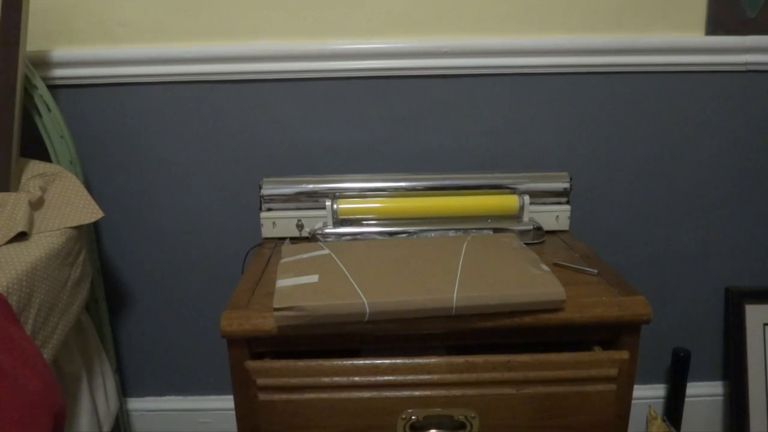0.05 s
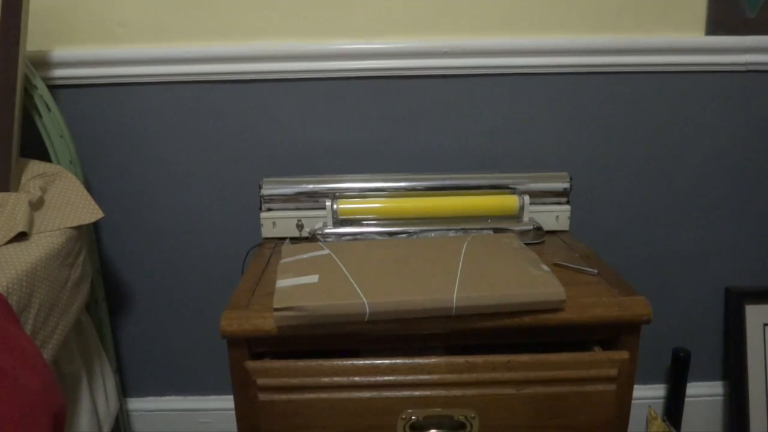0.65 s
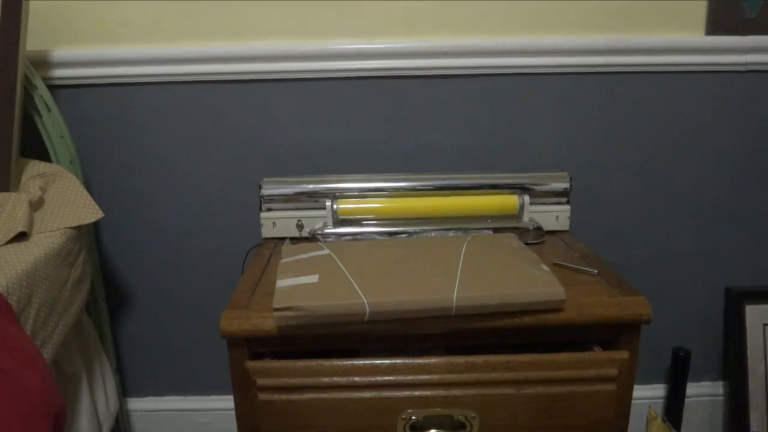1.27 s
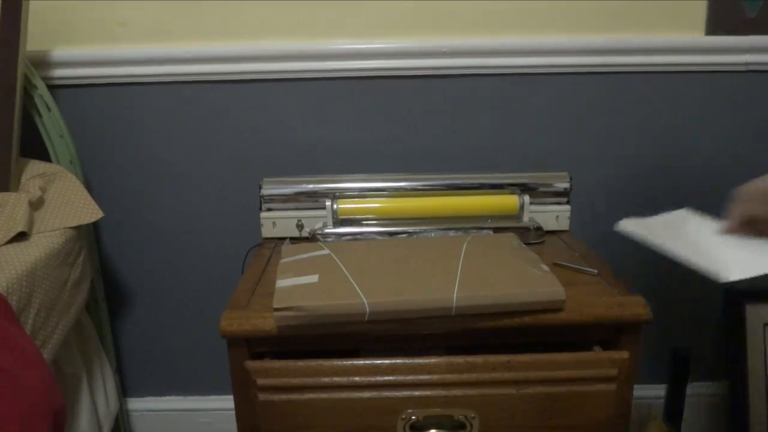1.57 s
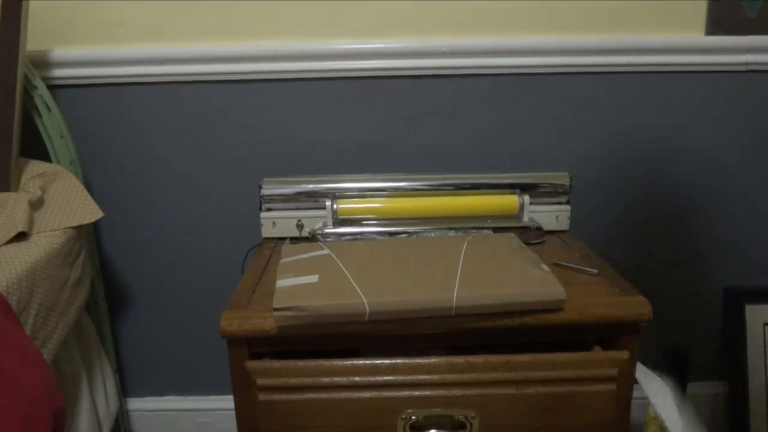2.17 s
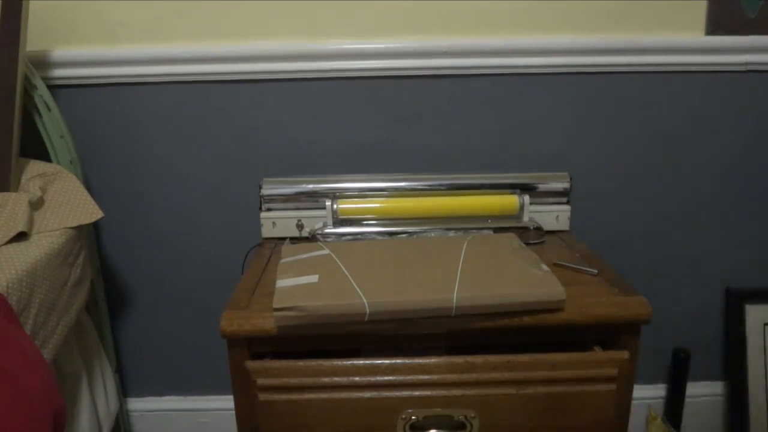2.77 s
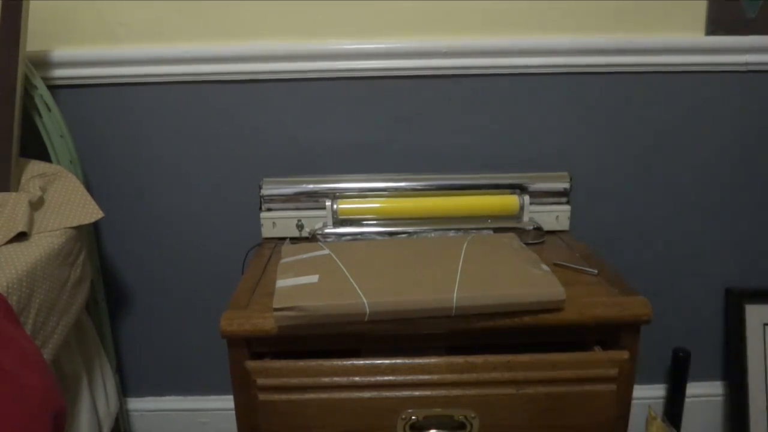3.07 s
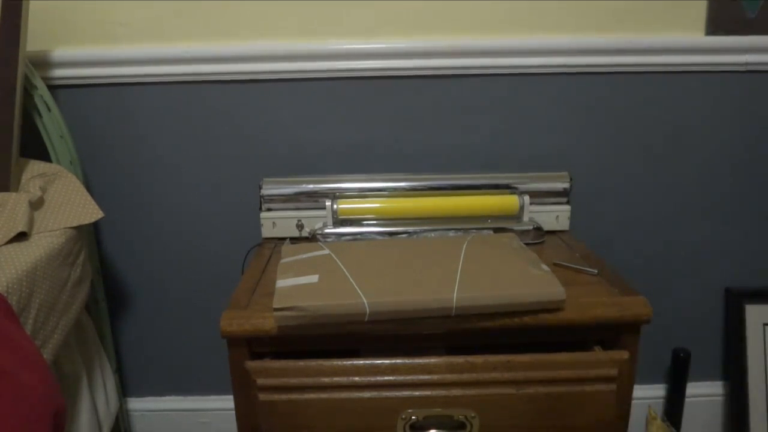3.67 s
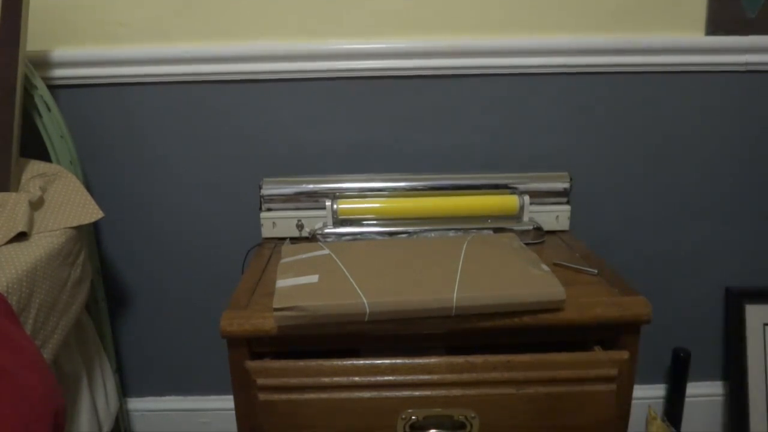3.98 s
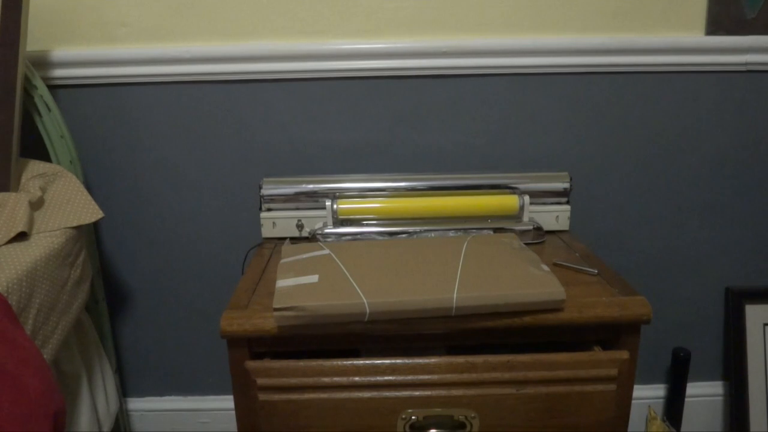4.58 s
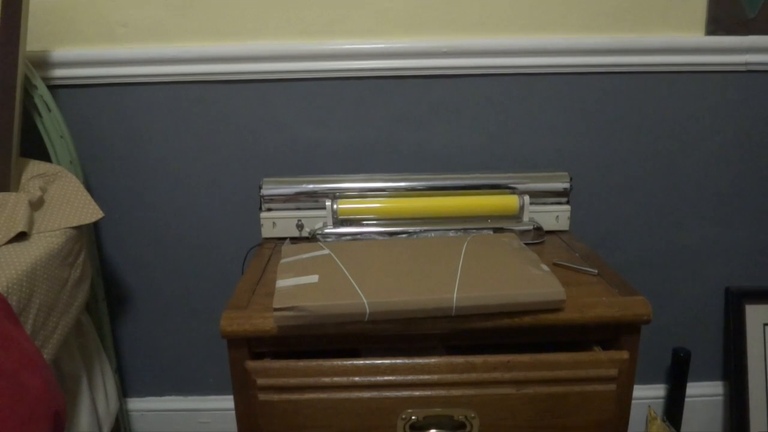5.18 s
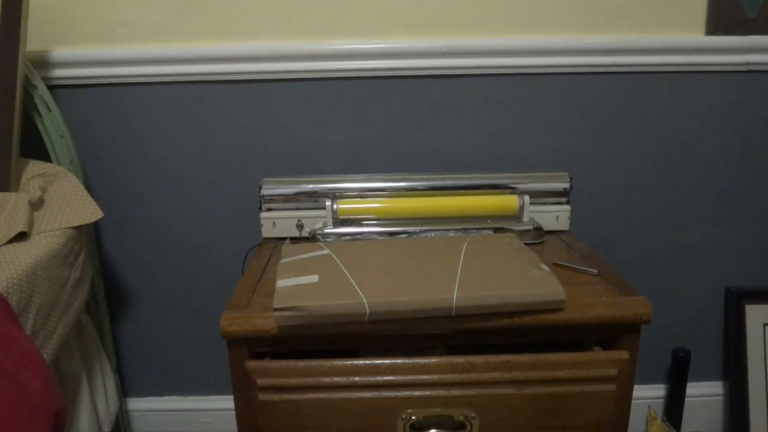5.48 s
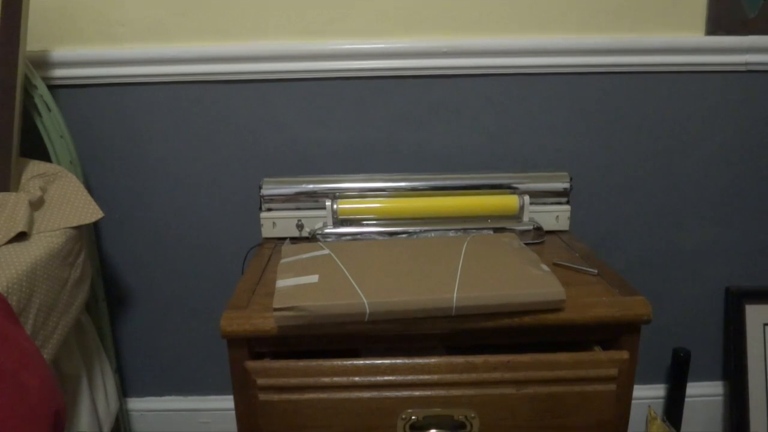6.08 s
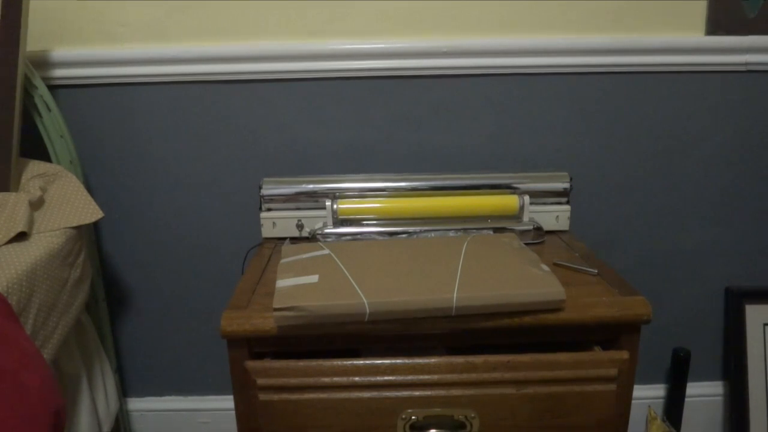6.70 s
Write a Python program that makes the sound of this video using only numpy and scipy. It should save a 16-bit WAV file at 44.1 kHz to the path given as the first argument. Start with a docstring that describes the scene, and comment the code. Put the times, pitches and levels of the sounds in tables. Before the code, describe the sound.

A paper envelope slides, crackles and is opened in a quiet room, with soft footsteps and a short floorboard creak.

```python
"""A paper envelope is drawn over a surface, then opened, and a note is pulled out, in a small quiet room.
Sheets hiss as their fibres rub and catch, creases snap as they buckle, and whole faces flip with a pop.
Before the opening, someone steps across a floorboard that sticks and slips in a short creak.
Steps and things put down give dull knocks, over a soft bed of room air."""
import sys
import numpy as np
from scipy import signal
from scipy.fft import rfft, irfft, next_fast_len
from scipy.io import wavfile

SR = 44100
rng = np.random.default_rng(int(sys.argv[2]) if len(sys.argv) > 2 else 0)


def master(y):
    """Save y as 16-bit WAV."""
    cut = np.clip(np.atleast_2d(y).T, -1, 1)
    pcm = np.round(cut * 32767)  # scale
    wavfile.write(sys.argv[1], SR, pcm.astype(np.int16))


N = 301862
TIME = np.arange(N) / SR


def paper_slide(grain_db, catch_db, catches_per_s, flutter_db, patchy_db, hollow_octaves=0.26, block=32):
    """Fibres rub in a fine grain and now and then catch; the bending sheet shifts its resonances."""
    # one sheet pushed along another: (start [s], length [s], level [dB], body [dB], brightness [dB])
    strokes = [(0.0, 0.02, -33.5, -11, -11), (0.043, 0.029, -31, 12.5, -15), (0.063, 0.095, -24, -10.5, 4),
               (0.137, 0.14, -27.5, -19, 3.5), (0.277, 0.048, -33.5, 10.5, 6.5),
               (0.354, 0.079, -42, 10, -3), (0.417, 0.076, -41.5, -2, 5), (0.52, 0.1, -49.5, 6, 10),
               (0.686, 0.13, -39.5, 2.5, -1.5), (0.816, 0.1, -49, -6, 8.5), (1.932, 0.08, -34.5, 7.5, 3),
               (2.009, 0.091, -38, 9, 6), (2.11, 0.044, -29, -6, -7), (2.276, 0.062, -35, 9, 5),
               (2.343, 0.093, -34.5, -4, 9), (2.604, 0.1, -38, 8.5, -25), (2.847, 0.056, -32.5, -14, -10.5),
               (2.99, 0.2, -34.5, -12, -5), (3.199, 0.12, -34.5, -10, 0.5), (3.288, 0.17, -24, -7.5, -5.5),
               (3.42, 0.24, -30.5, 1.5, -6.5), (3.894, 0.16, -38.5, -3, 6), (4.05, 0.145, -29, -3, -16),
               (4.223, 0.043, -28, -12, 5), (4.349, 0.084, -21.5, -7, -14.5), (4.51, 0.067, -27, 1, -14),
               (4.748, 0.19, -39, -8, 3), (4.862, .14, -38, 7.5, 3.5), (4.938, 0.017, -18, -19, -3),
               (5.06, .2, -46.5, 2, 2), (5.281, 0.059, -36.5, 10.5, 3), (5.418, 0.21, -49, 0, 6.5)]
    # light brushing while the paper is in the hands: (time [s], level [dB])
    brush = [(0, -42.5), (0.96, -44.5), (1.08, -57.5), (1.12, -43), (1.4, -44.5), (1.7, -41.5), (1.9, -46),
             (2.19, -40), (2.55, -48), (2.75, -43), (3.78, -40.5), (3.86, -41), (4.55, -36.5),
             (4.68, -44.5), (5.25, -42.5), (5.42, -45.5), (5.64, -51.5), (5.74, -59)]
    # tone of paper on paper: (frequency [Hz], gain [dB])
    slide_colour = [(60, -18), (130, -11), (280, -0.1), (520, -3), (900, -3), (1500, -2.8), (2300, -1.5),
                    (3500, -2.4), (5000, -3.5), (7000, -5), (10500, -5.5), (13000, -16), (15500, -28)]
    # the gap between the sheets rings: (middle [s], half length [s], frequency [Hz], boost [dB])
    hollows = [(0.328, .02, 950, 12), (2.0, .07, 560, 5), (2.05, .11, 4600, 6), (3.1, .11, 1800, 5),
               (3.335, .022, 1000, 9), (3.75, .07, 3100, 7)]
    brush_db, = in_time(brush)
    pushes = [from_db(brush_db)]
    pushes += [from_db(db) * hand_push(start, length) for start, length, db, _, _ in strokes]
    power = np.array([push[::block] for push in pushes]) ** 2
    brush_tone_db = (1.5, -1.5)   # body, brightness
    body_db, bright_db = np.transpose([brush_tone_db] + [row[3:] for row in strokes])
    rub = unit_energy(rng.standard_normal(N) * from_db(grain_db * drift(1800))) * np.sqrt(N)
    caught = rng.random(N) < catches_per_s / SR
    catches = caught * (2 * rng.random(N) - 1) * from_db(catch_db)
    flutter = flutter_db * drift(110)[::block]
    rings = [(hz, db * np.exp(-((TIME[::block] - s) / half) ** 4)) for s, half, hz, db in hollows]
    out = np.zeros(N)
    for hz, band in bands(rub + catches, count=30):
        ring_db = sum(db * np.exp(-(np.log2(hz / ring_hz) / hollow_octaves) ** 2) for ring_hz, db in rings)
        pressure = np.sqrt(from_db(tilt(hz, 2370, body_db, bright_db)) ** 2 @ power)
        patches = patchy_db * drift(25)[::block]   # each band wanders on its own
        gain = pressure * from_db(at_hz(slide_colour, hz) + ring_db + flutter + patches)
        out += band * np.repeat(gain, block)[:N]
    return out


def hand_push(start, length, attack_s=0.0074, attack_share=0.14, release_s=0.016):
    """A push gathers speed, a long one more slowly, and dies quickly once the hand stops."""
    rise = np.clip((TIME - start) / (attack_s + attack_share * length), 0, 1)
    return rise * np.exp(-np.clip((TIME - start - length) / release_s, 0, 20))


def paper_buckle(snap_body_db=-1.5, stiffening=0.18, flap_body_db=7, flap_bright_db=-24):
    """Creases snap and whole faces flip; stiffer creases snap harder and with less body."""
    # a crease buckles: (time [s], level [dB], brightness [dB], decay [ms])
    snaps = [(0.04, -6.5, 5, 0.99), (0.0505, 5, -3, 1.53), (0.072, 3.5, 1, 0.78), (0.1803, 13, -4, 2.56),
             (0.211, 14, -5, 5.7), (0.2685, 3.5, -10, 3.5), (0.326, -12, 0, 1.5), (1.11, -22, 18, 0.62),
             (2.534, 4.5, -12, 16), (2.633, 7, -9.5, 13.6), (2.959, -5.5, 1, 4.7), (3.105, 7, 1, 2.37),
             (3.111, 11.5, 0.5, 1.32), (3.292, -14, 11, 1.5), (3.3191, 9, 6.5, 5.5), (3.34, 7, 7.5, 4.3),
             (3.3597, 13, 1, 5.8), (3.365, 5.5, -4, 1.5), (3.375, 1, 8, 0.71), (3.38, 4, 10, 1.1),
             (3.392, 15, -6, 5), (3.502, 7.5, -18, 7.7), (3.5907, 14, 3, 3.4), (3.867, -13.5, 10, 1.36),
             (4.08, -2, 14, 2.2), (4.129, 2.5, 6, 4.8), (4.1598, 2.5, 9, 2.6), (4.2104, -1.5, 8, 2.6),
             (4.3229, 13.5, -3, 2.69), (4.3418, -5.5, 22.5, 0.6), (4.363, 7, 11, 2.9),
             (4.397, 14, -19, 4.22), (4.441, 5, 5, 0.71), (4.482, 5.5, 9, 0.93), (4.486, 13, -14, 3.2),
             (4.4975, 10.5, -20, 1.3), (5.026, 5, -34, 1.22), (5.132, -9.5, 3, 3.1), (5.269, -12, 1, 0.58),
             (5.283, 4, -35, 0.65)]
    # a face of the envelope flips with a dull pop: (time [s], level [dB], decay [ms])
    flaps = [(0.322, 4.5, 9.4), (3.32, 6.5, 3), (3.335, 10, 2.3), (3.408, 4.5, 9.5), (3.805, -3, 6.26),
             (4.324, 5, 3), (4.386, 7.5, 5.03), (5.328, 3.5, 5.3)]
    # tone of buckling paper: (frequency [Hz], gain [dB])
    snap_colour = [(60, -20.5), (130, -10.5), (280, -4.5), (520, 1), (900, 0.5), (1500, 2.3), (2300, 1),
                   (3500, 0.4), (5000, -3), (7000, -8.5), (10500, -12), (13000, -25), (15500, -37)]
    hits = [(s, db, snap_body_db - stiffening * db, bright_db, ms) for s, db, bright_db, ms in snaps]
    hits += [(s, db, flap_body_db, flap_bright_db, ms) for s, db, ms in flaps]
    return blows(hits, snap_colour, pivot_hz=2420, rise=0.38, lead=0.4,
                 spiky_db=2.5, wet_db=-4, width_db=-33)


def wood_knocks(heel_ms=5.2, hard_tap_ms=2.15):
    """Heavy steps and light taps on wood: a longer step scuffs brighter, a longer tap lands duller."""
    # feet land and shift on the floor: (time [s], level [dB], decay [ms])
    steps = [(1.11, 11.5, 3.4), (1.157, 6, 4.3), (1.228, 5.5, 4.8), (2.21, 0.5, 12.8), (2.28, 5, 14.2),
             (2.302, 1, 13.7), (2.744, 0.5, 8), (2.776, -6.5, 11.5), (2.823, -5.5, 8.6), (2.885, -5, 18.3),
             (4.264, -1.5, 4.1)]
    # light things are touched and put down: (time [s], level [dB], decay [ms])
    taps = [(0.388, 1.5, 10.5), (0.479, -5.5, 10.6), (0.595, -5.5, 10.3), (2.6994, 9, 2.8),
            (5.7765, 8.5, 1.4), (6.1442, 5, 2.3), (6.15, 6, 3.1)]
    # tone of knocked wood: (frequency [Hz], gain [dB])
    knock_colour = [(45, -12), (100, 1), (190, 8.5), (330, 1), (550, 0.5), (900, -3), (1500, -5),
                    (2300, -7), (4000, -15), (7000, -28), (13000, -53)]
    step_body_db, heel_bright_db, tap_body_db, tap_bright_db = 0.5, -21, -21, -4
    hits = []
    for s, db, ms in steps:
        scuff_db = 14.5 * np.log2(ms / heel_ms)
        hits.append((s, db, step_body_db, heel_bright_db + scuff_db, ms))
    for s, db, ms in taps:
        soft_db = 3.5 * np.log2(ms / hard_tap_ms)
        hits.append((s, db, tap_body_db + soft_db, tap_bright_db - soft_db, ms))
    return blows(hits, knock_colour, pivot_hz=667, rise=0.072, lead=0.1046,
                 spiky_db=5, wet_db=-2.5, width_db=-19.5)


def floorboard_creak(rasp_db, rasp_ms, low_hz, settle_s):
    """The board sticks and slips; every slip rings the same modes, the low ones more as weight settles."""
    # the floorboard slips: (time [s])
    slip_times = [1.4404, 1.4786, 1.5134, 1.5462, 1.5760, 1.607, 1.631, 1.6545, 1.6884, 1.7420, 1.779,
                  1.8270]
    # modes of the floorboard: (frequency [Hz], level [dB], T60 [s])
    modes = [(112.4, -49, 0.17), (195, -36.5, 0.098), (354, -35.5, 0.034), (553, -36, 0.028),
             (753, -48, 0.096), (1200, -31.5, 0.013), (1544, -38.5, 0.02), (2170, -32.5, 0.0063),
             (4110, -39.5, 0.013), (5300, -37, 0.004), (6700, -51, 0.011)]
    out, age = np.zeros(N), np.arange(SR // 4) / SR
    treble = signal.butter(2, [3100, 11500], "band", fs=SR, output="sos")
    for s in slip_times:
        unloaded = np.exp(-(s - slip_times[0]) / settle_s)
        slip_db, low_db = -2.5 * unloaded, -3 * unloaded   # early slips are weaker and thinner
        for k, (hz, mode_db, t60) in enumerate(modes):
            strength = from_db(slip_db + mode_db + low_db * (hz < low_hz) + rng.normal(0, 2))
            ring = np.sin(2 * np.pi * hz * age) * np.exp(-np.log(1000) * age / t60)
            add(out, s, (-1) ** k * strength * ring)
        rasp = signal.sosfilt(treble, slip_cluster(rasp_ms, rise=0.072, spiky_db=4))
        add(out, s, from_db(slip_db + rasp_db) * rasp)
    return out


def blows(hits, colour, pivot_hz, rise, lead, spiky_db, wet_db, width_db, size=16384):
    """Each blow is a cluster of slips with its own body and brightness, from its own spot in the room."""
    out, hz = np.zeros((2, N)), np.fft.rfftfreq(size, 1 / SR)
    for s, level_db, body_db, bright_db, ms in hits:
        slips = rfft(slip_cluster(ms, rise, spiky_db))
        heard = slips * rfft(room_response(wet_db, width_db, build_s=0.002))
        radiation = minimum_phase(level_db + at_hz(colour, hz) + tilt(hz, pivot_hz, body_db, bright_db))
        stereo = irfft(heard * whitening(heard.mean(0)) * radiation)
        for track, sound in zip(out, stereo):
            add(track, s - lead * ms / 1000, sound)   # the first slips come just ahead of the blow
    return out


def slip_cluster(ms, rise, spiky_db, size=16384):
    """A run of tiny slips that swells and dies, the longer runs more gradually; unit energy."""
    age = np.arange(size) / SR / (ms / 1000)   # in decay times
    noise = rng.standard_normal(size)
    spikes = from_db(spiky_db * np.repeat(rng.standard_normal(size // 16), 16))
    swell = (1 - np.exp(-2 * age / (rise * np.sqrt(ms)))) ** 2
    return unit_energy(noise * spikes * swell * np.exp(-age))


def pan_paper(x, shadow_hz):
    """The paper sits to the right; the far side is shaded, except from long waves."""
    # where the paper is: (time [s], left minus right [dB])
    place = [(0.2, -3.5), (1.2, -2), (2.3, -1.4), (3.1, -4), (3.7, -2), (5.3, -3)]
    side_db, = in_time(place)
    low = signal.sosfilt(signal.butter(1, shadow_hz, fs=SR, output="sos"), x)
    return low + (x - low) * from_db(side_db * [[1 / 2], [-1 / 2]])


def room_response(wet_db, width_db, build_s, size=16384):
    """Direct sound from one spot, then reflections that die by band and differ between the ears."""
    # decay of the small room: (frequency [Hz], T60 [s])
    room_t60 = [(120, 0.34), (400, 0.2), (1000, 0.24), (3000, 0.19), (8000, 0.18), (15000, 0.21)]
    age = np.arange(size) / SR
    tails = sum(band * np.exp(-np.log(1000) * age / at_hz(room_t60, hz))
                for hz, band in bands(rng.standard_normal((2, size)), count=7))
    build_up = 1 - np.exp(-(age / build_s) ** 2)
    mid, side = [unit_energy(tail * build_up) for tail in tails]
    # long waves reach both sides alike
    side = signal.sosfilt(signal.butter(1, 90, "high", fs=SR, output="sos"), side)
    return (age == 0) + from_db(wet_db) * (mid + from_db(width_db) * side * [[1], [-1]])


def in_room(x, wet_db, width_db, build_s):
    """Add stereo reflections while keeping the sound's broad colour."""
    spectrum = rfft(room_response(wet_db, width_db, build_s))
    response = irfft(spectrum * whitening(spectrum.mean(0)))
    return signal.fftconvolve(x[None], response, axes=1)[:, :N]


def room_tone(gain_db, hum_hz, hum_db, whine_hz, whine_db):
    """Steady air and hiss, alike in both ears in the bass, with a faint hum and a thin whine."""
    # tone of the air: (frequency [Hz], gain [dB])
    air_colour = [(25, -68), (50, -45), (100, -44), (170, -43.5), (300, -45), (600, -47.5), (1000, -51.0),
                  (1600, -52), (2500, -59), (5000, -63), (10000, -65.5), (15000, -65)]
    # stereo width of the air: (frequency [Hz], side minus mid [dB])
    air_width = [(60, -13), (200, -1.5), (700, 4.5), (2400, 2.5), (8000, -16)]
    hz = np.fft.rfftfreq(N, 1 / SR)
    mid, side = rfft(rng.standard_normal((2, N))) * from_db(gain_db + at_hz(air_colour, hz))
    air = irfft(mid + from_db(at_hz(air_width, hz)) * side * [[1], [-1]], N)
    hum = from_db(hum_db) * np.sin(2 * np.pi * hum_hz * TIME)
    whine = from_db(whine_db) * np.sin(2 * np.pi * whine_hz * TIME)
    return air + hum + whine


def from_db(db):
    """Decibels to gain."""
    return 10 ** (np.asarray(db) / 20)


def unit_energy(x):
    """Scale so that the squares sum to one."""
    return x / np.sqrt(np.sum(x ** 2) + 1e-20)


def in_time(rows):
    """Each column of a curve, sample by sample."""
    s, *columns = np.transpose(rows)
    return [np.interp(TIME, s, column) for column in columns]


def at_hz(points, hz):
    """Read a curve on a log-frequency axis."""
    f, value = np.transpose(points)
    return np.interp(np.log(np.maximum(hz, 1)), np.log(f), value)


def tilt(hz, pivot_hz, body_db, bright_db):
    """Two shelves in dB: large moving areas add body below the pivot, sharp contacts treble above."""
    octaves = np.log2(np.maximum(hz, 1) / pivot_hz)
    reach = np.maximum(abs(octaves) - .5, 0) / 1.5
    return np.where(octaves < 0, body_db * np.minimum(reach, 1), bright_db * np.minimum(reach, 1.2))


def drift(rate_hz):
    """Random wandering with a spread near one."""
    knots = rng.standard_normal(N // 8)
    return np.interp(TIME * rate_hz, np.arange(len(knots)), knots)


def bands(x, count):
    """Split into overlapping bands that add up to the whole; yields (centre [Hz], band)."""
    size = next_fast_len(x.shape[-1])
    whole, hz = rfft(x, size), np.maximum(np.fft.rfftfreq(size, 1 / SR), 1)
    centres = np.geomspace(70, 15500, count)
    for centre, pick in zip(centres, np.eye(count)):
        weight = np.interp(np.log(hz), np.log(centres), pick)
        yield centre, irfft(whole * weight, size)[..., :x.shape[-1]]


def minimum_phase(db):
    """A response with the given gains in which nothing sounds before the blow."""
    cepstrum = irfft(np.log(from_db(db)))
    half = len(cepstrum) // 2
    cepstrum[1:half] *= 2
    cepstrum[half + 1:] = 0
    return np.exp(rfft(cepstrum))


def whitening(spectrum, span=1.434, margin=14):
    """Filter that levels the broad colour of a spectrum and leaves its fine ripple."""
    total, bins = np.cumsum(abs(spectrum) ** 2), np.arange(len(spectrum))
    low = np.clip(bins / span - margin, 0, bins[-1]).astype(int)
    high = np.clip(bins * span + margin, 0, bins[-1]).astype(int)
    mean_power = (total[high] - total[low]) / np.maximum(high - low, 1)
    return minimum_phase(-10 * np.log10(np.maximum(mean_power, 1e-12)))


def add(track, s, sound):
    """Mix a sound in at a time."""
    at = max(round(s * SR), 0)
    track[at:at + len(sound)] += sound[:N - at]


def scene():
    """Paper a little to the right; knocks and creak near the middle; room air behind."""
    snaps = from_db(0.5) * paper_buckle()
    slide = paper_slide(grain_db=0.5, catch_db=16.5, catches_per_s=170, flutter_db=1, patchy_db=2.42)
    slide = from_db(-0.5) * in_room(slide, wet_db=-10, width_db=-29, build_s=0.002)
    knocks = from_db(3) * wood_knocks()
    creak = from_db(4) * floorboard_creak(rasp_db=-15.5, rasp_ms=4.1, low_hz=500, settle_s=0.11)
    creak = in_room(creak, wet_db=-1.5, width_db=-20, build_s=0.0014)
    paper = pan_paper(snaps + slide, shadow_hz=452)
    wood = (knocks + creak) * from_db([[-.3], [.3]])
    return paper + wood + room_tone(gain_db=0.5, hum_hz=182, hum_db=-74.5, whine_hz=12242, whine_db=-81)


def record(dry):
    """A steep low-pass takes off the very top."""
    cutoff_hz = 16200
    return signal.sosfilt(signal.ellip(10, .1, 80, cutoff_hz, fs=SR, output="sos"), dry)


dry = scene()
out = record(dry)
master(out)
```